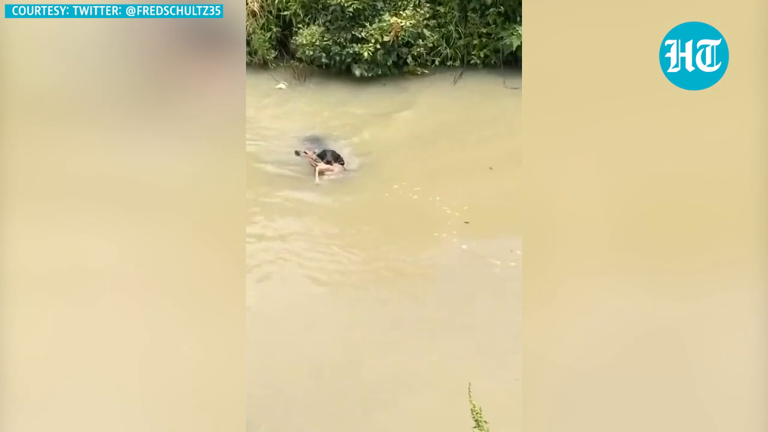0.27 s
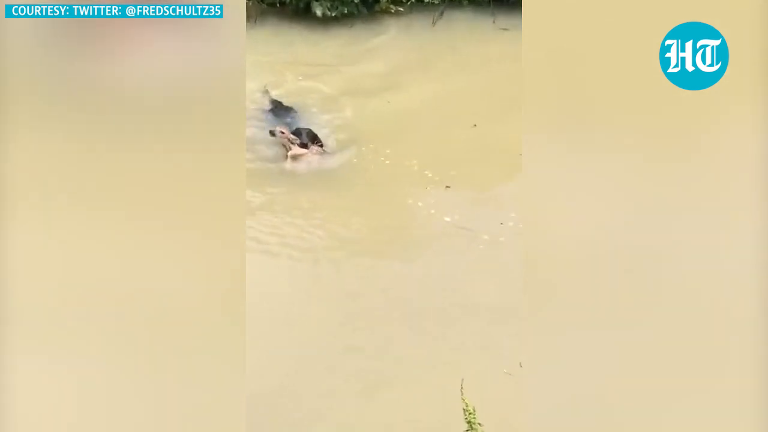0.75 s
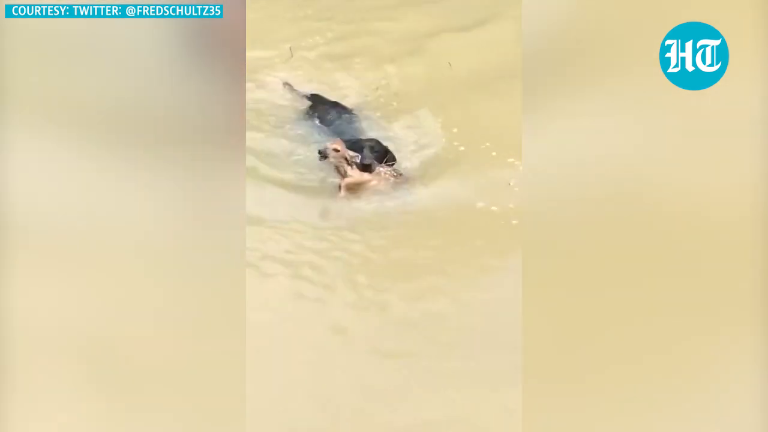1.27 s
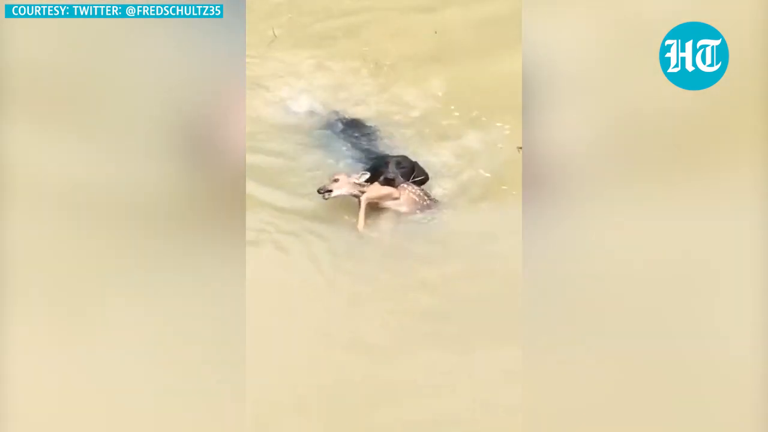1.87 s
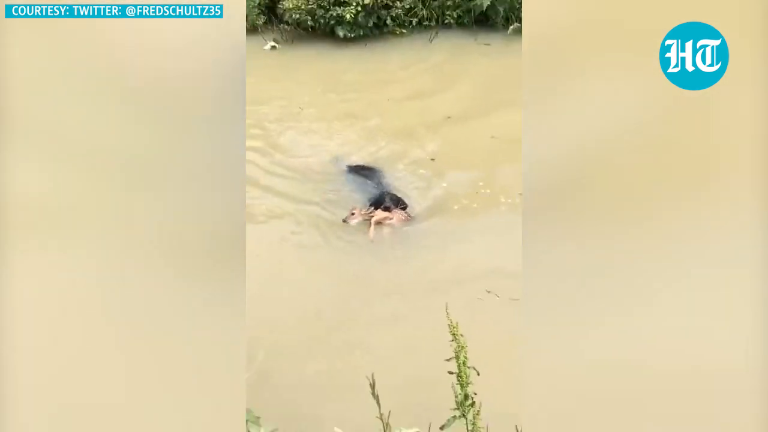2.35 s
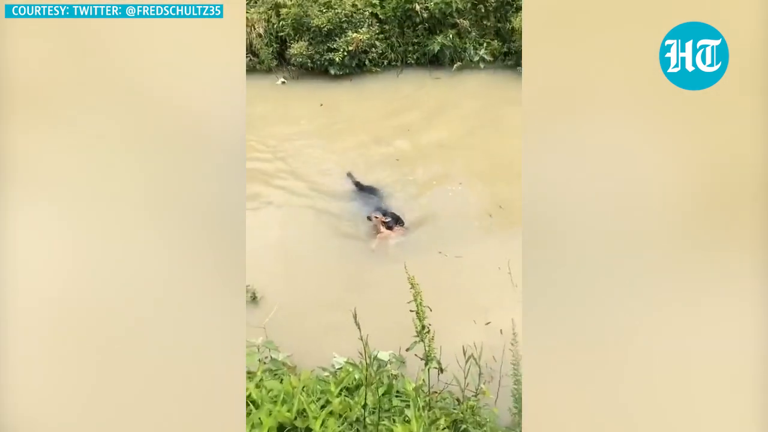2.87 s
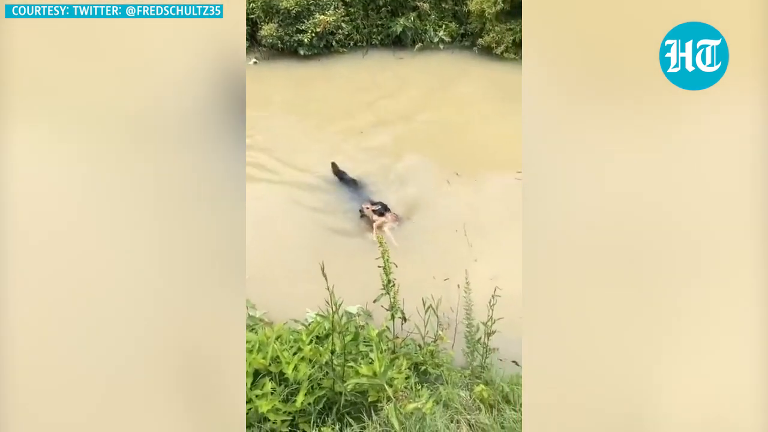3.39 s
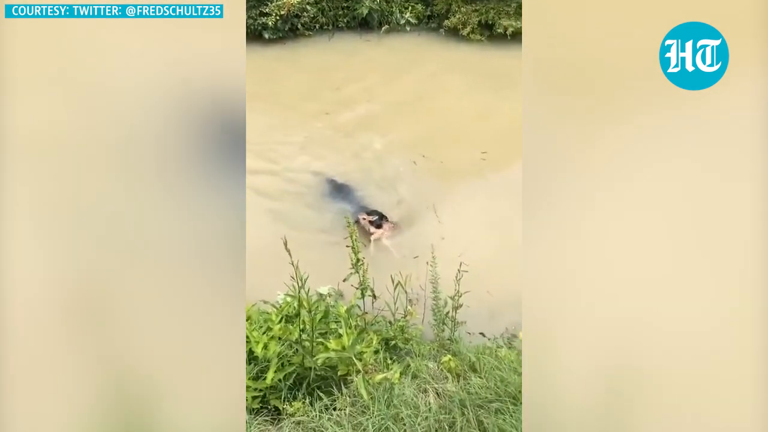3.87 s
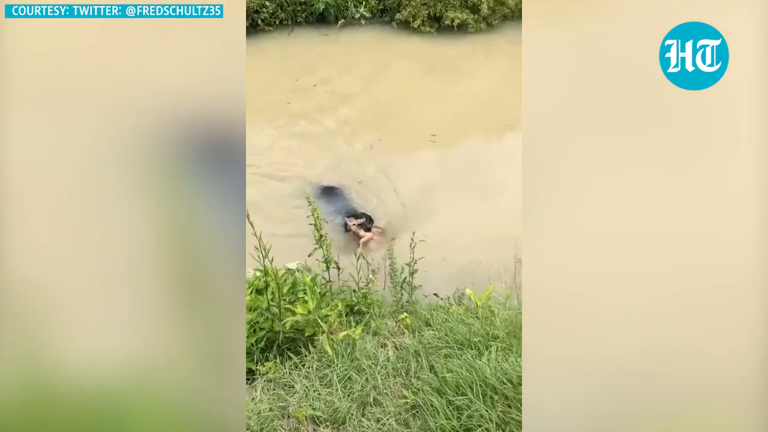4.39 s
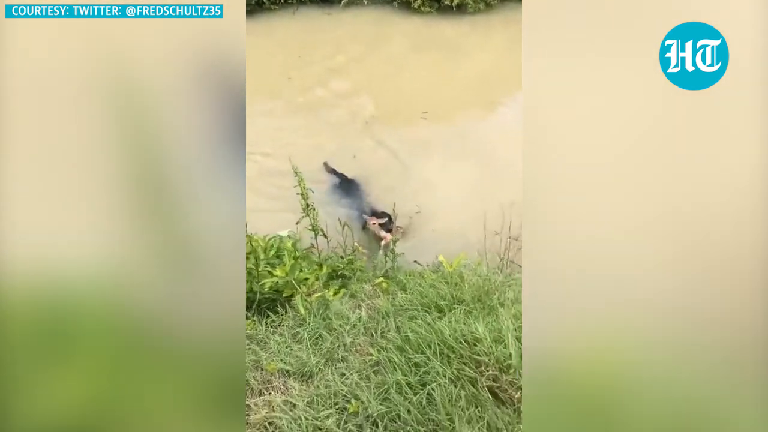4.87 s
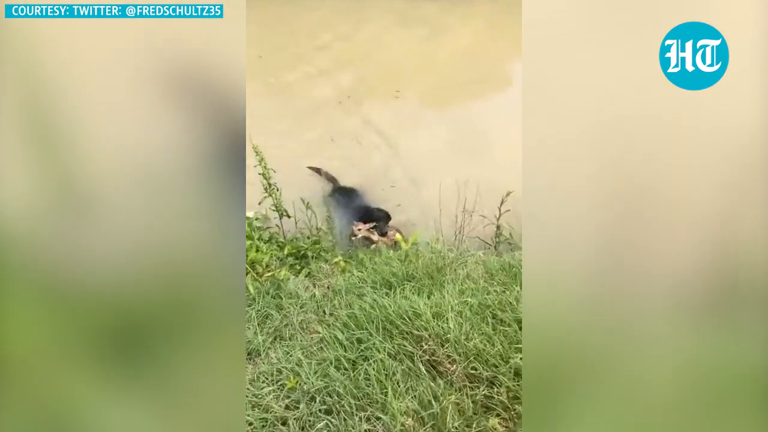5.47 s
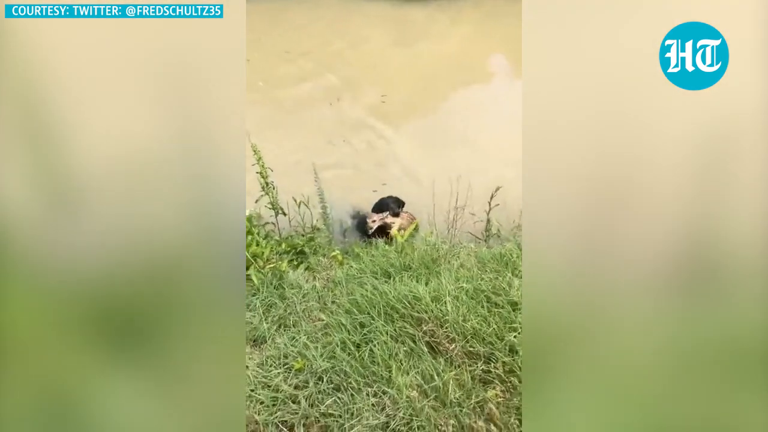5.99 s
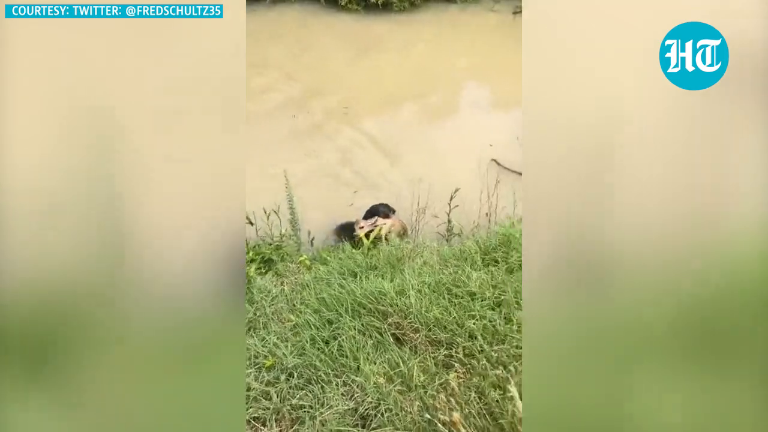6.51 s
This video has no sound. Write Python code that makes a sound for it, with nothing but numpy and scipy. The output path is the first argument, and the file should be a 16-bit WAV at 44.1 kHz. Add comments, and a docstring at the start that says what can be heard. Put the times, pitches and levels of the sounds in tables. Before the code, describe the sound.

A fawn gives two piercing, nasal bleats close by, overloading the microphone, above steady river hiss, a low chugging idle engine and soft steps through grass.

```python
"""From the grassy bank of a muddy river: water hisses, a twin-cylinder engine idles and a small bird chips.
Feet swish through the grass, and a fawn, in the mouth of a swimming dog, gives a loud, shrill bleat.
Soft steps, plops, chips and snapping stalks follow; the rustle grows, and a second, longer bleat comes.
Filtered noise makes water and grass, puffs ring an exhaust, and vocal-fold partials drive formants.
The bleats overload the microphone, and bushes on the banks return a faint tail of them."""
import sys
import numpy as np
from scipy import signal
from scipy.fft import rfft, irfft, next_fast_len
from scipy.io import wavfile
from scipy.ndimage import uniform_filter1d, minimum_filter1d

SR = 44100
rng = np.random.default_rng(int(sys.argv[2]) if len(sys.argv) > 2 else 0)


def unload_audio(sound):
    """Save the sound as a 16-bit wav file, at the path given as the first command line argument."""
    columns = np.transpose(np.atleast_2d(sound))
    # keep every value between -1 and 1, then stretch to whole-number steps
    steps = np.round(np.clip(columns, -1, 1) * 32767)
    wavfile.write(sys.argv[1], SR, steps.astype(np.int16))


N = 297234


def from_db(db):
    """Decibels to gain."""
    return 10 ** (np.asarray(db) / 20)


def rms_one(x):
    """Scale to rms 1."""
    return x / np.sqrt(np.mean(x ** 2) + 1e-20)


def in_time(rows, t):
    """The columns of a curve, interpolated at times t."""
    s, *columns = np.transpose(rows)
    return [np.interp(t, s, column) for column in columns]


def at_hz(points, hz):
    """A spectrum in dB, read on a log-frequency axis."""
    f, db = np.transpose(points)
    return np.interp(np.log(np.maximum(hz, 1)), np.log(f), db)


def band(x, low, high, order=2):
    """Butterworth band-pass from low to high in Hz."""
    return signal.sosfilt(signal.butter(order, [low, high], "band", fs=SR, output="sos"), x)


def drift(rate, size):
    """Smooth chance with spread 1 that changes about rate times a second."""
    f = np.arange(size // 2 + 1) * SR / size
    smoothing = (1 + (f / rate) ** 2) ** 2
    return rms_one(irfft(rfft(rng.standard_normal(size)) / smoothing, size))


def coloured(x, spectrum):
    """Give x a spectrum; rms 1."""
    size = next_fast_len(len(x))
    f = np.arange(size // 2 + 1) * SR / size
    filtered = irfft(rfft(x, size) * from_db(at_hz(spectrum, f)), size)
    return rms_one(filtered[:len(x)])


def grains(per_s, spread_db):
    """Random tiny clicks of uneven size and either sign; rms 1."""
    sizes = from_db(spread_db * np.minimum(rng.exponential(1, N), 4))
    signs = rng.choice([-1, 1], N)
    present = rng.random(N) < per_s / SR
    return rms_one(sizes * signs * present)


def bump(t, s, half_s):
    """A smooth swell of height 1 around time s."""
    return np.exp(-((t - s) / half_s) ** 2)


def left_of(elapsed, length):
    """The share of a ramp that is still to go: 1 at its start, 0 after its length."""
    return np.clip(1 - elapsed / length, 0, 1)


def add(out, s, sound):
    """Mix a sound in at time s."""
    at = max(0, round(s * SR))
    out[at:at + len(sound)] += sound[:max(0, N - at)]


def glides(rows):
    """Short gliding tones that swell and die away along half a sine."""
    out = np.zeros(N)
    for s, db, start_hz, end_hz, length in rows:
        u = np.linspace(0, 1, round(length * SR))
        hz = start_hz * (end_hz / start_hz) ** u
        phase = 2 * np.pi * np.cumsum(hz) / SR
        add(out, s, from_db(db) * np.sin(np.pi * u) * np.sin(phase))
    return out


# Colour of the rushing water. Each row: frequency in Hz, relative level in dB per Hz.
RIVER_COLOUR = [(250, 8), (480, -0.5), (800, -3.5), (1100, -6), (1700, -6.5), (2600, -11.5), (3700, -10),
                (4800, -19), (6000, -24), (8500, -41), (12000, -51)]
RIVER_DB, RIVER_FALL_DB_PER_S = -38.5, 0.28   # the rush fades slowly along the walk


def river(t, bubbly=0.41, ripple_db=1.5):
    """An even rush of noise with a fizz of small bubbles in it, heard as sparse clicks."""
    fizz = grains(per_s=900, spread_db=3.5)
    water = coloured(rng.standard_normal(N) + bubbly * fizz, RIVER_COLOUR)
    level_db = RIVER_DB - RIVER_FALL_DB_PER_S * t + ripple_db * drift(41, N)
    return from_db(level_db) * water


# Plops in the water. Each row: start in seconds, peak level in dB, start pitch in Hz, end pitch in Hz,
# length in seconds.
WATER_PLOPS = [(2.41, -36, 1800, 1400, .012), (2.576, -30.5, 1090, 270, 0.012),
               (2.867, -37, 1190, 275, 0.017), (3.387, -37, 3280, 3030, 0.0085),
               (3.398, -33.5, 2460, 3080, 0.0088)]


def plops():
    """Each plop of water is one brief gliding tone."""
    return glides(WATER_PLOPS)


# Calls of the small bird. Each row: start in seconds, peak level in dB, start pitch in Hz, end pitch in Hz,
# length in seconds.
BIRD_CHIPS = [(0.0, -37, 3660, 3480, 0.035), (2.917, -37, 3770, 3380, 0.008), (3.0, -38, 3630, 3500, 0.034)]


def bird():
    """Each chip is a short whistle that slides down in pitch."""
    return glides(BIRD_CHIPS)


# Steady rustle: it grows when the feet reach long grass.
LONG_GRASS_S, SHORT_GRASS_DB, LONG_GRASS_DB = 4.15, -60, -51.5
# Colour of the rustling blades. Each row: frequency in Hz, relative level in dB per Hz.
GRASS_COLOUR = [(900, -15.5), (2000, -1), (3300, -1), (4700, -6), (5900, -18.5), (8500, -12.5),
                (10500, -20.5), (13000, -21.5)]
# Strides that brush through the grass. Each row: centre in seconds, level in dB, half-length in seconds.
STRIDES = [(0.0, -51, 0.11), (1.285, -44, 0.076), (2.26, -44, 0.065), (3.269, -44.5, 0.078),
           (4.227, -45.5, 0.083), (4.45, -50, 0.13), (4.77, -48.5, 0.12), (5.282, -42, 0.13),
           (6.28, -46.5, 0.085), (6.603, -45, 0.21)]


def grass(t):
    """Blades brush past: a dense stream of tiny clicks that swells with each stride."""
    rustle = from_db(np.where(t < LONG_GRASS_S, SHORT_GRASS_DB, LONG_GRASS_DB))
    stride_power = sum((from_db(db) * bump(t, s, half_s)) ** 2 for s, db, half_s in STRIDES)
    brushing = np.sqrt(rustle ** 2 + stride_power)
    return brushing * coloured(grains(per_s=7000, spread_db=0.5), GRASS_COLOUR)


# Soft footfalls. Each row: start in seconds, level in dB, pitch of the noise in Hz, rise in seconds.
FOOTFALLS = [(1.255, -34.5, 785, .002), (1.291, -41, 730, .03), (2.247, -34.5, 880, 0.0031),
             (2.271, -39, 540, 0.0045), (2.287, -30, 830, 0.0044), (2.866, -36, 750, 0.0021),
             (3.254, -36.5, 830, 0.027), (5.054, -39, 915, .002), (5.322, -35, 710, 0.013),
             (5.388, -35, 776, 0.0047), (6.578, -40.5, 745, 0.011)]


def footfalls(t):
    """Feet crush the turf: narrow-band noise that rises and dies away more slowly."""
    out = np.zeros(N)
    step = t[:SR // 4]
    for s, db, hz, rise in FOOTFALLS:
        crush = rms_one(band(rng.standard_normal(len(step)), hz * 0.68, hz * 1.23))
        envelope = step / rise * np.exp(1 - step / rise)
        add(out, s, from_db(db) * crush * envelope)
    return out


# Colour of a cracking dry stalk. Each row: frequency in Hz, relative level in dB per Hz.
STALK_COLOUR = [(1500, -18), (3500, 11), (5500, -4), (7500, -8), (10000, -14), (13000, -35)]
# Dry stalks that snap. Each row: start in seconds, level in dB before the common trim.
STALK_SNAPS = [(0.9153, -35.5), (1.0445, -36), (3.4316, -28.5), (3.917, -27.5), (6.5654, -28.5)]


def snapping_stalks(t, decay_s=0.0036, trim_db=-6):
    """A dry stalk breaks with a burst of bright noise that decays within milliseconds."""
    out = np.zeros(N)
    short = t[:SR // 20]
    for s, db in STALK_SNAPS:
        crack = coloured(rng.standard_normal(len(short)), STALK_COLOUR)
        add(out, s, from_db(db + trim_db) * crack * np.exp(-short / decay_s))
    return out


# Speed of the idling engine on the bank. Each row: time in seconds, four-stroke cycles per second.
IDLE_SPEED = [(0.29, 10.37), (0.72, 10.62), (1.56, 10.329), (1.92, 10.406), (3.95, 10.474), (4.97, 10.283),
              (5.44, 10.426)]
FIRST_FIRING_S = .0415   # when the leading cylinder is first heard
# Exhaust resonances. Each row: frequency in Hz, width in Hz, level in dB before the engine's level,
# polarity as a sign.
EXHAUST_RESONANCES = [(38.1, 2.37, -31, -1), (49.23, 5.7, -34, 1), (80.4, 9.2, -34.5, -1),
                      (111.6, 22.2, -35.5, 1), (128.5, 16.1, -42, -1), (203, 36.5, -55, -1),
                      (349.9, 24.4, -60, -1)]
# Colour of the steady rumble. Each row: frequency in Hz, relative level in dB per Hz.
RUMBLE_COLOUR = [(16, 0), (24, 33), (34, 30.5), (55, 24), (120, 24), (200, 20.5), (300, -28), (500, -46)]
RUMBLE_DB = -35.5


def engine_puffs(second_lag=0.2309, second_db=-1.0, uneven_db=0.7):
    """Two cylinders fire about half a turn apart, then rest; the lag is in four-stroke cycles."""
    run_in = SR // 2   # the exhaust is already ringing at time 0
    speed, = in_time(IDLE_SPEED, np.arange(-run_in, N) / SR)
    cycles = np.cumsum(speed) / SR
    cycles = cycles - cycles[run_in + round(FIRST_FIRING_S * SR)]
    puffs = np.zeros(len(speed))
    for lag, db in ((0, 0), (second_lag, second_db)):
        at = np.flatnonzero(np.diff(np.floor(cycles - lag)))
        strength = from_db(db + uneven_db * rng.standard_normal(len(at)))
        puffs[at] += strength * SR / speed[at]
    silencer = signal.butter(2, 900, fs=SR, output="sos")   # rounds each puff
    return signal.sosfilt(silencer, puffs), run_in


def engine(level_db=1.31, timbre_db=1.0):
    """Each puff rings the resonances of the exhaust, over a steady low rumble."""
    puffs, run_in = engine_puffs()
    exhaust = 0
    for hz, width_hz, db, polarity in EXHAUST_RESONANCES:
        r = np.exp(-np.pi * width_hz / SR)   # pole radius
        # no two burns are alike
        drive = puffs * from_db(db + timbre_db * rng.standard_normal(len(puffs)))
        ring = signal.lfilter([1, 0, -1], [1, -2 * r * np.cos(2 * np.pi * hz / SR), r * r], drive)
        exhaust = exhaust + np.sign(polarity) * (1 - r * r) / 2 * ring[run_in:]
    rumble = coloured(rng.standard_normal(N), RUMBLE_COLOUR)
    return from_db(level_db) * exhaust + from_db(RUMBLE_DB) * rumble


def banks(x, t60=1.0, wet_db=-36, top_hz=5000):
    """Bushes on the banks scatter back a faint, dull tail."""
    t = np.arange(SR) / SR
    tail = band(rng.standard_normal(SR), 710, top_hz) * from_db(-60 * t / t60)
    return from_db(wet_db) * signal.fftconvolve(x, tail / np.linalg.norm(tail))[:N]


# Catches, where the folds slip for an instant. Each row: centre in seconds, change of level in dB.
VOICE_CATCHES = [(1.446, -12), (1.459, -1.5), (1.481, -11.5), (1.522, -6.5), (1.559, 2), (5.709, -5),
                 (5.759, 0), (5.809, -3.5), (5.861, -6), (5.909, -5), (5.96, 4), (6.025, -9.5)]
CATCH_ROUGHNESS, CATCH_RATTLE_S = .2, .003   # added at each catch (0-1), half-length
# Rasps under strain. Each row: start in seconds, end in seconds, final roughness from 0 to 1 before easing.
VOICE_RASPS = [(1.43, 1.55, .2), (1.563, 1.64, 0.45), (5.623, 5.66, 0.18), (5.696, 5.725, 0.2),
               (6.035, 6.11, 0.4)]
RASP_START_SHARE = 0.61   # of the final roughness
RASP_EASE_S = .025   # time that a rasp takes to set in and to clear
CLEAR_ROUGHNESS = .04   # of the held voice (0-1)
EDGE_ROUGHNESS, EDGE_S = 0.48, .025   # added as a bleat starts and ends (0-1), length


def roughness(t):
    """The folds run nearly clear, but waver at start and stop, rasp under strain and rattle at a catch."""
    edges = left_of(t - t[0], EDGE_S) + left_of(t[-1] - t, EDGE_S)
    rasp = sum(amount * np.interp(t, [start, end], [RASP_START_SHARE, 1], left=0, right=0)
               for start, end, amount in VOICE_RASPS)
    rasp = uniform_filter1d(rasp, size=round(RASP_EASE_S * SR))
    catches = sum(bump(t, s, CATCH_RATTLE_S) for s, db in VOICE_CATCHES)
    return CLEAR_ROUGHNESS + EDGE_ROUGHNESS * edges + rasp + CATCH_ROUGHNESS * catches


# The next three lists give dB for the main, low, middle, high and top formant, in that order.
# A bleat swells from these levels, relative to its hold.
ATTACK_FROM_DB = [-23, -7, -12, -11, -4]
# It dies towards these, relative to its hold; the top loses most.
RELEASE_TO_DB = [-15.5, -19, -27, -20, -34]
# What a shut mouth takes from each formant.
SHUT_MOUTH_DB = [-23.5, -6, -8.5, -15, -15.5]
# The piercing main formant sags and its neighbours take over. Each row: centre in seconds, half-length in
# seconds, depth in dB, swell of the middle formant in dB, swell of the high formant in dB.
MAIN_SAGS = [(1.53, 0.16, 12, 11.5, -5), (1.66, 0.076, 19, 7, 11), (5.573, 0.034, 13.5, 0.5, 3.5),
             (5.736, 0.017, 12.5, 3, 2), (5.857, 0.025, 9.5, 4, 4.5), (6.04, 0.11, 4.5, 9, 0)]
LOW_TAKES = 0.27   # dB that the low formant gains for each dB of sag


def formant_levels(t, starting, ending, shut, hold):
    """Level in dB of each formant: attack, hold, release, the mouth's opening, and the main one's sags."""
    sag, middle, high = sum(np.outer(changes, bump(t, s, half_s)) for s, half_s, *changes in MAIN_SAGS)
    shifts = [-sag, LOW_TAKES * sag, middle, high, 0]
    columns = zip(hold, ATTACK_FROM_DB, RELEASE_TO_DB, SHUT_MOUTH_DB, shifts)
    return [db + attack_db * starting + release_db * ending + shut_db * shut + shift
            for db, attack_db, release_db, shut_db, shift in columns]


def vocal_folds(pitch, rough, slips, jitter=0.042, shimmer=0.5, tripling=0.32, air=0.08,
                flutter_db=3.0, catch_rise=0.0216):
    """Tight folds give twenty partials; under strain they rattle and fall into a three-cycle pattern."""
    size = len(pitch)
    # a catch that dips in level rises in pitch
    catch_shift = sum(slip * (1 - from_db(db)) for slip, (s, db) in zip(slips, VOICE_CATCHES))
    pitch = pitch * (1 + jitter * rough * drift(427, size) + catch_rise * catch_shift)
    phase = 2 * np.pi * np.cumsum(pitch) / SR
    source = 0
    for k in range(1, 21):
        # each partial flutters as its reflection from the water shifts
        flutter = from_db(flutter_db * drift(41.0, size))
        source = source + flutter * np.cos(k * phase + rng.uniform(0, 2 * np.pi))
    three_cycle = tripling * rough ** 2 * np.cos(phase / 3 + drift(48, size))
    rattle = shimmer * rough * drift(210, size) + three_cycle
    breath = air * rough * rng.standard_normal(size) * (1 + np.cos(phase))
    return rms_one(source) * (1 + rattle) + breath


# Bands of the main, low, middle, high and top formant. Each row: lower edge in Hz, upper edge in Hz.
FORMANTS = [(3100, 3850), (550, 2400), (2400, 3100), (3850, 5250), (5250, 13000)]


def bleat(t, pitch, rough, levels, throat, waver_db=1.6, catch_s=0.0026):
    """The throat colours the folds' sound; each formant band is evened out, then set to its own level."""
    size = len(t)
    slips = [bump(t, s, catch_s) for s, db in VOICE_CATCHES]
    voice = coloured(vocal_folds(pitch, rough, slips), throat)
    out = 0
    for (low, high), db in zip(FORMANTS, levels):
        formant = band(voice, low, high, order=4)
        even = formant / np.sqrt(uniform_filter1d(formant ** 2, size=700) + 1e-12)
        out = out + even * from_db(db + waver_db * drift(20, size))
    catch_db = sum(slip * db for slip, (s, db) in zip(slips, VOICE_CATCHES))
    return out * from_db(catch_db) * signal.windows.tukey(size, .03)


# The two bleats. Each row: start, end, attack, release, time the mouth takes to open, time it takes to
# close, all in seconds.
BLEAT_TIMES = [(1.384, 1.834, 0.012, 0.069, 0.06, 0.12), (5.46, 6.102, 0.04, 0.017, 0.083, 0.064)]
# Pitch of the vocal folds before jitter and catches, one curve a bleat. Each row: time in seconds,
# pitch in Hz.
FOLD_PITCH = [
    [(1.38, 704), (1.405, 679.5), (1.445, 684.6), (1.495, 711.5), (1.55, 719.2), (1.625, 719.3),
     (1.65, 707.5), (1.75, 693.3), (1.8, 680.5), (1.83, 630)],
    [(5.46, 775), (5.485, 700), (5.52, 657.3), (5.58, 666), (5.8, 673.3), (5.93, 677.4), (6.01, 669),
     (6.043, 652), (6.07, 555), (6.1, 528)],
]
# Held levels before the fawn's gain, one row a bleat. Each row: main, low, middle, high and top formant in dB.
HELD_LEVELS = [(2, -30, -26, -20.5, -24), (-5.5, -22, -22.5, -16.5, -26)]
# Throat colour, one table a bleat. Each row: frequency in Hz, relative level in dB.
THROAT_COLOUR = [
    [(700, -27), (1420, -17.5), (2130, -9), (2850, -1.5), (3550, -10), (4250, -7.5), (4950, -12.5),
     (5650, -21), (6400, -25.5), (7100, -41), (7750, -24.5), (8450, -22), (10000, -36.5), (12500, -44)],
    [(670, -27.5), (1340, -2.5), (2020, -2.5), (2700, -13), (3370, 2), (4040, -17.5), (4720, -16.5),
     (5400, -22.5), (6070, -20.5), (6750, -25), (7450, -33), (8900, -20), (10300, -39.5), (12500, -37)],
]


def fawn(t, gain_db=1.4):
    """In each bleat the voice sets in, the mouth opens wide, holds, and closes as the voice dies."""
    out = np.zeros(N)
    for times, curve, hold, throat in zip(BLEAT_TIMES, FOLD_PITCH, HELD_LEVELS, THROAT_COLOUR):
        start, end, attack, release, opens, closes = times
        during = t[(t >= start) & (t < end)]
        starting = left_of(during - start, attack)
        ending = left_of(end - during, release)
        shut = left_of(during - start, opens) + left_of(end - during, closes)
        pitch, = in_time(curve, during)
        levels = formant_levels(during, starting, ending, shut, hold)
        add(out, start, bleat(during, pitch, roughness(during), levels, throat))
    return from_db(gain_db) * out


def scene():
    """Everything heard from the grassy bank, as one channel."""
    t = np.arange(N) / SR
    walking = grass(t) + footfalls(t) + snapping_stalks(t)
    cries = fawn(t)
    return (river(t) + plops() + bird() + walking + engine() + banks(cries) + cries)[None]


def limiter(x, threshold=1.16):
    """The gain ducks within a few milliseconds around any peak over the threshold."""
    needed = threshold / np.maximum(np.abs(x), threshold)
    return x * uniform_filter1d(minimum_filter1d(needed, size=200), size=200)


SOFT_TOP_HZ, CUTOFF_HZ = 13100, 15850   # top of the microphone, final cut


def record(dry):
    """The microphone loses the top treble, a limiter holds the bleats, their tips clip, the top is cut."""
    microphone = signal.ellip(10, .1, 70, SOFT_TOP_HZ, fs=SR, output="sos")
    soft = signal.sosfilt(microphone, dry)
    clipped = np.clip(limiter(soft[0])[None], -1, 1)
    top_cut = signal.ellip(12, .1, 80, CUTOFF_HZ, fs=SR, output="sos")
    return signal.sosfilt(top_cut, clipped)


dry = scene()
out = record(dry)
unload_audio(out)
```